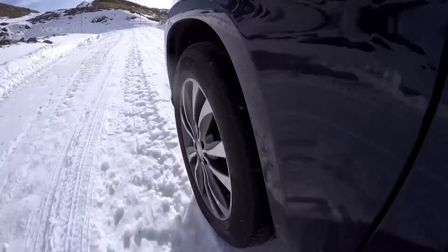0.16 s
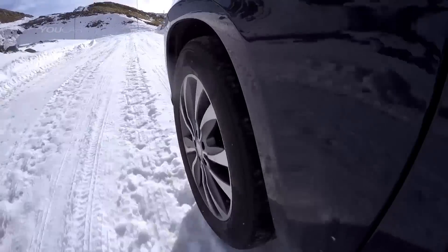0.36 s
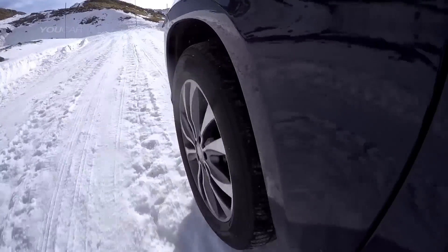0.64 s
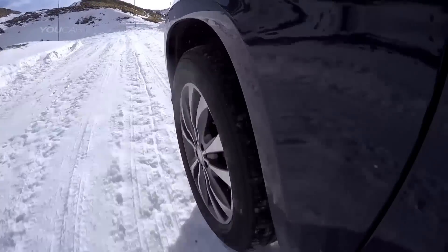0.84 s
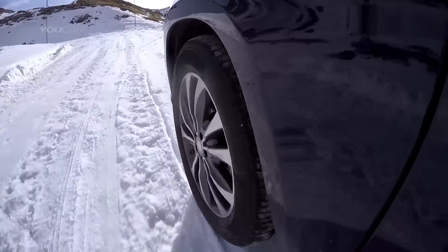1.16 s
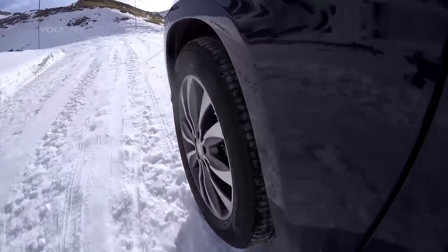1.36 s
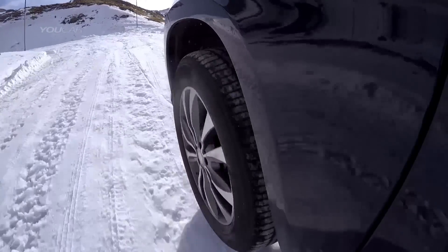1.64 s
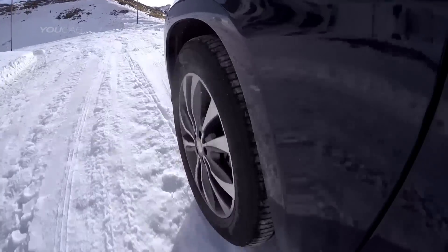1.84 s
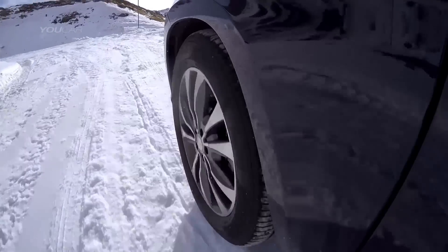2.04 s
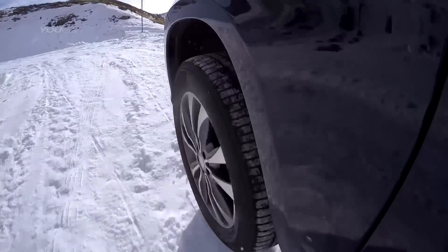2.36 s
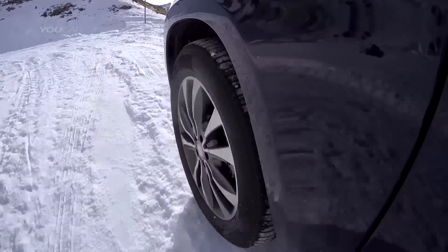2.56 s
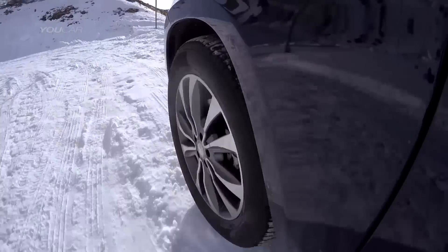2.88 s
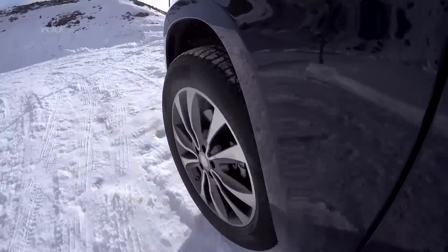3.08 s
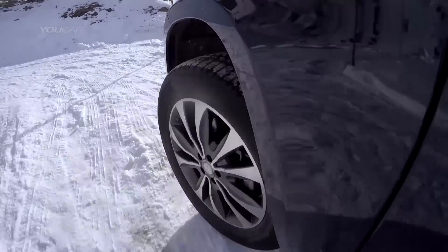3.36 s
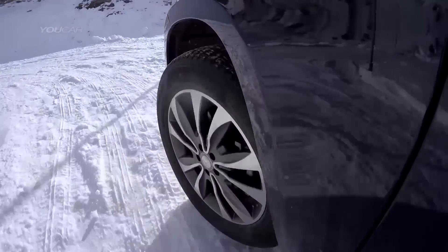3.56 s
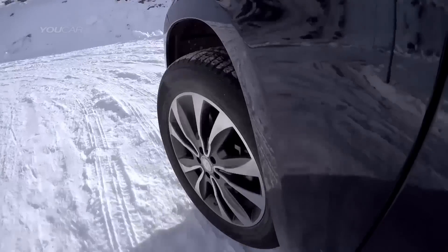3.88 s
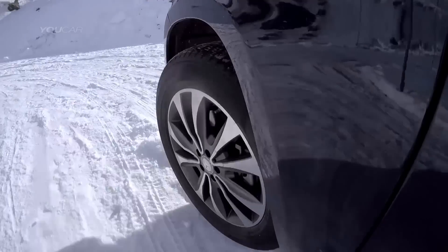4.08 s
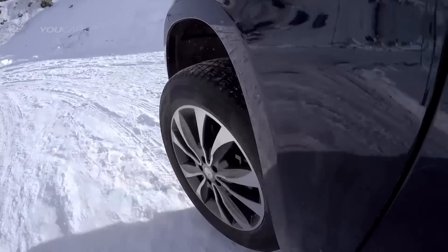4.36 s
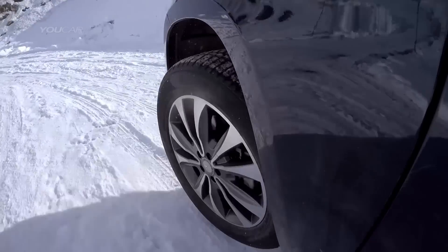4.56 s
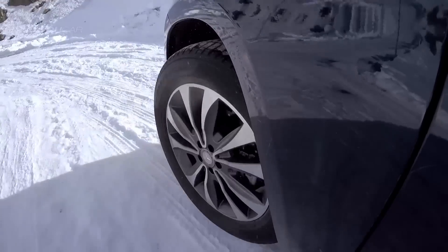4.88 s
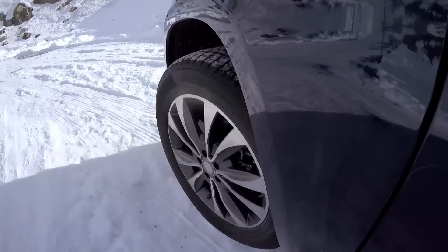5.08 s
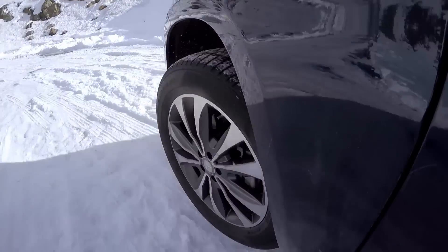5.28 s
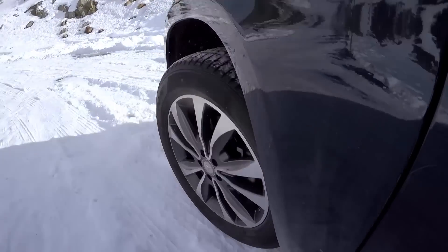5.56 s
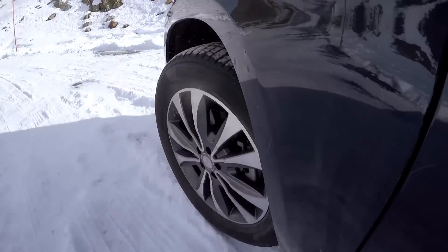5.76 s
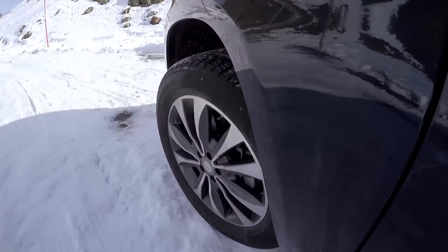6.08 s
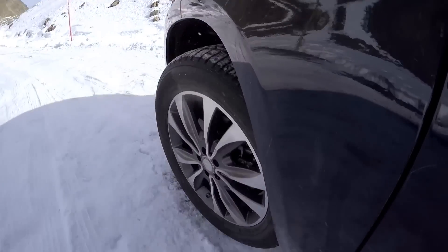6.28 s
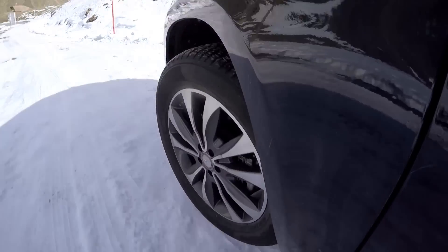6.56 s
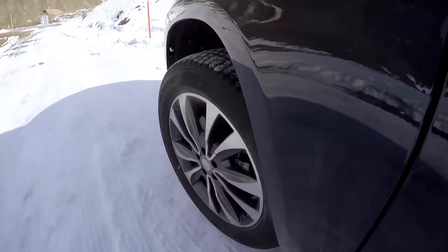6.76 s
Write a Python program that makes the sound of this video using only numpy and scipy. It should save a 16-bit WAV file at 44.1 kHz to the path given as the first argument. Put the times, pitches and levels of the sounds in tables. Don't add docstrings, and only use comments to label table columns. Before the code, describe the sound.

A mono, dry, very close outdoor sound from a microphone on a car door beside the front wheel. Throughout, a deep uneven shudder sways and booms like heavy wind rumble, with low road drone, soft tread rush and faint engine-bay hiss. From 0 to 2.5 s the tyre rolls straight: a hard ice tick at 0.1 s, then small brittle crust cracks, clustered from 0.7 to 1.0 s, and fine grit ticking on the panel. A strong sharp crack and chip hit at about 1.95 s with a puff of powder. The car eases off, and from 2.6 s the turning tyre sticks and slips in short runs of hollow, woody crunches. Big snow blocks snap near 3.1, 3.55 and 3.9 s; a hard tick lands at 4.7 s; the densest, loudest crunching comes at 5.2-5.6 s. Sparser crunches and ticks continue to 6.9 s, over a barely audible, fluttering high electronic whine.

```python
import sys
import numpy as np
from scipy import signal
from scipy.fft import rfft, irfft, next_fast_len
from scipy.io import wavfile
from scipy.ndimage import uniform_filter1d, map_coordinates

SR = 44100
rng = np.random.default_rng(int(sys.argv[2]) if len(sys.argv) > 2 else 0)


def invert_db(level):
    return 10 ** (np.asarray(level, dtype=float) / 20)


def int16_out(signal):
    q = np.round(np.clip(np.atleast_2d(signal).T, -1, 1) * 32767)
    wavfile.write(sys.argv[1], SR, q.astype(np.int16))


N = 305613

# start_s, peak_db, bright_db
CRUST_CRACKS = [(0.058, -21, 0), (0.0878, -20, -2), (0.4956, -30, -2), (.5061, -25.5, -8), (0.683, -24, 6),
                (0.719, -19, 4), (0.7422, -18, 0), (0.7652, -21.5, -1), (.8182, -16.5, -1), (.864, -22, 4),
                (0.886, -22, 6), (.9224, -39, 3), (0.975, -19.5, -0.5), (.9955, -17, 2), (1.0208, -34, 2),
                (1.1675, -22, 5), (1.358, -20.5, -0.5), (1.6177, -24, 9), (1.718, -18, -2), (1.75, -22, -2),
                (1.7592, -16.5, 7.5), (1.7837, -29.5, -15), (1.8184, -30, 5), (1.8995, -29, 7),
                (1.9592, -12, -2.5), (2.1297, -21, -1), (2.234, -27, -1), (2.308, -23, 0),
                (2.4302, -36, -11), (2.5429, -21, 3)]
# first_s, last_s, slip_count, peak_db
SLIP_RUNS = [(2.598, 2.7434, 3, -9), (2.793, 2.8086, 2, -6.5), (2.846, 2.86, 2, -23),
             (2.895, 2.968, 3, -7.5), (2.917, 2.997, 3, -20.5), (3.014, 3.084, 4, -20),
             (3.147, 3.167, 2, -17), (3.453, 3.478, 2, -17.5), (3.7308, 3.854, 3, -12.5),
             (3.769, 3.91, 3, -16.5), (4.3887, 4.4282, 2, -11.5), (4.573, 4.636, 2, -17),
             (4.6548, 4.6705, 2, -9), (4.698, 4.7633, 3, -12.5), (4.942, 4.985, 2, -22.5),
             (5.039, 5.054, 2, -14), (5.088, 5.106, 2, -15), (5.181, 5.224, 3, -14.5),
             (5.267, 5.2815, 2, -10.5), (5.377, 5.3898, 2, -6.5), (5.415, 5.451, 3, -5),
             (5.481, 5.528, 2, -11.5), (5.559, 5.613, 2, -13), (5.719, 5.739, 2, -21),
             (5.786, 5.8, 2, -23.5), (6.16, 6.194, 2, -20), (6.23, 6.308, 2, -16.5),
             (6.644, 6.725, 3, -14.5), (6.791, 6.824, 3, -15.5), (6.85, 6.867, 2, -10.5)]
# start_s, peak_db
SNOW_BLOCKS = [(2.7038, -19), (2.73, -19), (2.78, -29), (2.884, -26), (3.0976, -15), (3.1195, -7.5),
               (3.217, -12.5), (3.547, -8), (3.868, -8.5), (3.8761, -17), (3.914, -4.5), (4.1023, -24.5),
               (4.198, -11), (4.326, -19), (4.458, -26), (4.4922, -15.5), (4.508, -13.5), (4.802, -13.5),
               (5.3189, -12.5), (5.343, -7), (5.3523, -2.5), (5.5817, -16), (5.8173, -14), (5.9748, -16.5),
               (6.107, -17), (6.281, -21.5), (6.369, -21), (6.562, -11), (6.752, -10), (6.921, -12.5)]
# pitch_hz, width_hz, level_db
ARCH_MODES = [(493.4, 44, -2), (687, 72, 3), (918.4, 45, -6), (1315, 144, -5), (1614, 133, -3),
              (1817, 143, -7), (2244, 69, -6), (2467, 87, -5.5), (2914.5, 170, -12), (4320, 100, -31),
              (5050, 260, -27), (5780, 180, -23.5)]
# pitch_hz, width_hz, level_db
TYRE_MODES = [(233, 14, -6.5), (295.3, 65, -0.5)]

# start_s, peak_db, panel_share_db, bright_db
ICE_CHIPS = [(0.0874, 4, -20.5, -0.5), (0.1994, -18, -10, 11), (0.7837, -24, -4.5, 22.5),
             (0.8883, -14, -7, 11), (0.9407, -21, 0, 15.5), (1.7185, -23, -5, 9), (1.82, -17.5, -8, 8),
             (1.831, -11.5, -12.5, 3), (1.9586, 4.5, -11.5, 7), (1.9592, -5, -9, -8),
             (1.984, -13.5, -10.5, 7), (2.5579, -7, -12.5, 4), (2.814, -17, -5.5, 1),
             (2.8585, -15.5, -7, 0), (3.481, -17, -5, 16), (3.7012, -16.5, -12, 6), (3.8483, -12, -20, -8),
             (4.147, -17.5, -23, 1), (4.619, -16, -10.5, 6), (4.7011, -0.5, -9, 12),
             (4.7654, -16.5, -34, 6), (4.9823, -18.5, -21, 7), (5.0044, -12, -8, 1),
             (5.4504, -21.5, -7, 12.5), (5.5354, -10.5, -17, -1), (5.746, -15, -13, -26),
             (5.83, -22, -23, 11), (6.015, -24.5, -15, 14.5), (6.2466, -23, -12, 6),
             (6.3436, -9.5, -15, 10)]
# start_s, peak_db, bright_db
PANEL_GRIT = [(0.0306, -28, -12), (0.0743, -33, 8), (0.1056, -36, -14), (0.1151, -35, 6),
              (0.18, -26.5, -3), (0.2241, -37, 3), (0.2334, -33, 1), (0.5652, -31.5, -7),
              (0.5924, -42, 12), (0.9471, -24, -10), (0.9718, -25.5, 8), (0.9972, -30, 7),
              (1.0066, -31, 4), (1.0219, -29, -6), (1.0762, -32, -2), (1.091, -45, 11),
              (1.1127, -41, 10), (1.1716, -43, 13), (1.1825, -32, 6), (1.1954, -42, 17),
              (1.2052, -36, 2), (1.2115, -40, 15), (1.228, -35, 9), (1.3032, -30.5, 5), (1.3387, -49, 9),
              (1.351, -32, 11), (1.3561, -29, -2), (1.3951, -31.5, -5), (1.63, -38, 4), (1.6597, -32, 0),
              (1.6771, -28, 1), (1.7067, -32, 0), (1.7261, -28, 4), (1.7647, -31, -20), (1.8088, -46, 5),
              (1.842, -29, 2), (1.8755, -37, 6), (1.8829, -32, 0), (1.8912, -26, -12), (1.8953, -29, -1),
              (1.9003, -29, 7), (1.9054, -27, -3), (1.9183, -30, -3), (1.9222, -30, 15), (1.938, -33, 1),
              (1.95, -27, -4), (1.9749, -44, 10), (1.992, -31, 4), (2.0072, -30, 9), (2.0261, -40, 13),
              (2.516, -34, -25), (2.076, -35, -5), (2.1105, -43, 4), (2.1285, -27.5, -2),
                (2.1818, -30.5, 12), (2.3981, -40, -13), (2.4422, -46, 11), (2.5358, -39, 4),
                (2.5693, -46, 8), (2.6347, -31, -2), (2.6471, -41, 14), (2.8066, -30, -6), (2.9453, -40, 8),
                (2.969, -35, -27), (3.3857, -31.5, 4), (3.3949, -34, 2), (3.4008, -40, -3),
                (3.5344, -42, 7), (3.5495, -32, -8), (3.6075, -30, 1), (3.616, -37, -4), (3.681, -27, -4),
                (3.6896, -36, 22), (3.696, -33, 10), (3.7141, -35, 1), (3.7295, -45, 1), (3.7804, -44, 7),
                (3.812, -35, -7), (3.8316, -38, 9), (3.86, -21.5, -15), (3.915, -28, -30),
                (3.9763, -28.5, -8), (4.043, -37, -6), (4.093, -50, 14), (4.1554, -42, -1),
                (4.2112, -40, 5), (4.2217, -41, 5), (4.2829, -41, 10), (4.2974, -37, -7), (4.4134, -39, 0),
                (4.5881, -31, 4), (4.592, -28, 2), (4.6283, -44, 16), (4.649, -42, 5), (4.673, -37, 8),
                (4.687, -42, -9), (4.6944, -24, 1), (4.7124, -47, -6), (4.735, -26, -13), (4.75, -44, -6),
              (4.771, -44, 1), (4.799, -34.5, -9), (4.8561, -27, 2), (4.883, -37, 15),
                  (4.8982, -45, 21), (4.9411, -39, 5), (4.9462, -42, 0), (4.962, -35, 6), (4.9869, -27, 5),
                  (5.13, -29.5, 5.5), (5.184, -30.5, 4), (5.2397, -29, -10), (5.3561, -46, -27),
                  (5.3944, -32, -4), (5.4182, -40, -28), (5.509, -40, 10), (5.5179, -33, 5),
                  (5.5899, -37, 2), (5.6194, -33, 4), (5.6789, -48, 14), (5.716, -38, 4), (5.726, -37, 9),
                  (5.785, -32, 8), (5.901, -39.5, -11), (5.9475, -37, 2), (5.9564, -31.5, 5),
                  (6.0763, -32, -5), (6.0891, -34, -6), (6.126, -40, 2), (6.1468, -38, 10),
                  (6.1862, -37, 1), (6.212, -37, 4), (6.2272, -29, 13), (6.2402, -32, 5), (6.26, -33, 14),
                  (6.2666, -29, -9), (6.273, -28, -2), (6.312, -33, 5), (6.3237, -30, -5),
                  (6.3372, -47, 22), (6.3754, -31, -14), (6.3824, -28, -2), (6.387, -31, -1),
                  (6.3927, -29, -3), (6.4175, -35, 5), (6.4676, -35, -4), (6.471, -27.5, -16),
                  (6.6794, -38.5, 10), (6.6872, -45, 13), (6.737, -31, -17)]
# pitch_hz, width_hz, level_db
PANEL_MODES = [(2040, 330, -5), (2940, 1000, -4), (4350, 510, -3.5), (4800, 110, 2), (5350, 260, -2.5)]
# pitch_hz, width_hz, level_db
SKIN_MODES = [(6710, 740, -1), (8790, 790, -3), (10530, 590, -6.5)]
# pitch_hz, width_hz, level_db
EDGE_MODES = [(11260, 3400, -8.5), (15800, 2700, -12)]

# pitch_hz, level_db (per Hz)
DRONE_SPECTRUM = [(95, 6.5), (125, -3), (151, 2.5), (170, -6), (213, 1), (250, -6.5), (295, -2),
                  (340, -12.5), (380, -28.5), (450, -14.5)]
# start_s, drone_db
ROAD_ROUGHNESS = [(0.0, -35), (0.04, -45.5), (0.21, -37), (1.79, -44), (2.41, -41), (2.45, -47.5),
                  (2.76, -39.5), (3.24, -45), (3.9, -39.5), (4.15, -43), (4.21, -37.5), (4.9, -45.5),
                  (5.34, -40.5), (6.5, -45.5), (6.56, -40.5), (6.77, -40), (6.89, -46), (6.93, -32)]
# pitch_hz, level_db (per Hz)
TREAD_SPECTRUM = [(240, -10), (400, -2), (570, -4), (684, -1), (821, -3.5), (918, 2.5), (1100, -2.5),
                  (2240, -5), (2910, -8.5), (3290, -13), (3750, -9.5), (4500, -22.5), (5850, -19.5),
                  (9900, -120)]
# start_s, rolling_db
ROLLING_PACE = [
    (0, -0.5),
    (.9, -1),
    (1.5, -4),
    (2.4, -8),
    (6.93, -9),
]
# middle_s, half_length_s, peak_db
SNOW_PATCHES = [(1.5, .25, -51), (1.77, 0.064, -31), (1.9, 0.086, -36.5), (2.78, 0.022, -30.5),
                (2.95, 0.048, -30), (3.15, 0.48, -39.5), (3.89, 0.045, -27), (4.21, 0.04, -39),
                (4.65, 0.088, -31.5), (4.44, 0.05, -42), (5.07, 0.057, -47), (5.41, 0.12, -33.5),
                (5.8, 0.25, -42.5), (6.27, 0.17, -38.5), (6.8, 0.16, -38)]
# middle_s, half_length_s, peak_db
POWDER_SPRAYS = [
    (0, 0.24, -61),
    (.9, 0.71, -63.5),
    (1.68, 0.032, -57),
    (1.93, 0.057, -50),
    (3.68, 0.15, -62.5),
    (4.21, 0.15, -69),
    (4.91, 0.21, -65.5),
    (6.11, 0.051, -63),
    (6.25, 0.032, -67),
    (6.37, 0.11, -65),
]
# pitch_hz, level_db (per Hz)
POWDER_SPECTRUM = [(2000, -37), (4500, 6), (6000, -2.5), (9000, -5.5), (12000, -5), (14500, -10),
                   (15300, -12)]
# pitch_hz, width_hz, level_db
ENGINE_BAY_MODES = [(2894, 550, 5), (3700, 177, 6.5), (4650, 1540, -2), (5430, 130, -5.5),
                    (6650, 340, -7.5)]
# pitch_hz, width_hz, level_db
IDLE_MODES = [(2965, 124.3, -1), (3670, 300, -5.5), (6800, 360, -11)]

# start_s, pitch_hz
SWAY_CURVE = [(0, 27.9), (3, 28.52), (3.4, 24.43), (5.3, 22.46), (5.45, 28.36), (6.2, 25.84), (6.93, 24.93)]
# start_s, pitch_hz
BOOM_CURVE = [(0, 70.3), (.45, 67.14), (.72, 69.9), (.84, 79), (1.0, 71.96), (1.5, 72), (2.02, 63.36),
              (2.18, 68.67), (2.4, 64.8), (3.1, 70.93)]
# start_s, drift_share
BOOM_WANDER = [(0, 0.04), (1, 0.025), (2.3, .03), (2.6, 0.1007), (6.93, 0.089)]
# middle_s, half_length_s, peak_db
ROAD_RUTS = [(.03, 0.25, -35), (.42, 0.18, -13.5), (.9, 0.074, -19), (1.15, 0.11, -15.5),
             (1.6, 0.39, -13.5), (2.35, 0.063, -12.5), (2.72, 0.07, -10.5), (3.17, 0.22, -12.5),
             (3.58, 0.13, -14), (3.92, 0.044, -7.5), (4.16, 0.17, -11.5), (4.42, 0.15, -14),
             (4.8, 0.095, -16.5), (5.05, 0.12, -12.5), (5.28, 0.16, -9), (5.77, 0.055, -26),
             (5.9, 0.019, -9), (6.05, 0.1, -27), (6.26, 0.092, -21), (6.7, 0.5, -12), (6.92, 0.072, -12.5)]
# middle_s, half_length_s, peak_db
SNOW_RIDGES = [(.1, 0.16, -8), (.39, 0.088, -9.5), (.76, 0.11, -6.5), (1.08, 0.037, -12.5),
               (1.42, 0.34, -6.5), (1.87, 0.089, -12.5), (2.19, 0.11, -5.5), (2.62, 0.2, -22.5),
               (3.32, 0.15, -14), (3.9, 0.087, -16), (4.15, 0.018, -19), (4.3, 0.062, -14.5),
               (4.59, 0.13, -15.5), (5, 0.038, -18), (5.19, 0.046, -19), (5.48, 0.09, -15.5),
               (5.77, 0.018, -13), (5.9, 0.025, -20), (6.15, 0.22, -22), (6.73, 0.21, -16.5)]
# pitch_hz, level_db (per Hz)
SHUDDER_SPECTRUM = [(8, -52), (18, -18), (36, -0.5), (46, 1), (62, -0.5), (88, -0.5), (100, -19.5),
                    (125, -38)]

# start_s, pitch_hz, level_db
FRAME_LOAD = [
    (0, 9950, -62),
    (.008, 9660, -55),
    (.018, 8950, -55),
    (.026, 8840, -55),
]
BUSY_FRAMES = [1, 5, 8, 11, 15, 19, 21, 25, 29, 32, 35, 39, 43, 46, 49, 53, 57, 60, 63, 67, 71, 73, 77, 80,
               81, 85, 88, 91, 95, 99, 102, 106, 110, 112, 116, 121, 124, 127, 131, 135, 138, 141, 145, 149,
               151, 155, 159, 163, 165, 169]
# pitch_hz, level_db
MIC_RESPONSE = [(8, 0.5), (14600, -0.5), (15300, -5), (16400, -26), (16500, -62)]


def unit(x):
    return x / np.sqrt(np.mean(x ** 2) + 1e-20)


def noise():
    return rng.standard_normal(N)


def curves(rows):
    s, *cols = np.transpose(rows)
    return [np.interp(np.arange(N) / SR, s, c) for c in cols]


def wobble(rate):
    knots = rng.standard_normal(int(N * 400 / SR) + 4)
    return map_coordinates(knots, [np.arange(N) * min(rate, 400) / SR])


def swells(rows, floor_db, round_top=1):
    t = np.arange(N) / SR
    peaks = sum(invert_db(db - 7 * (np.abs(t - s) / half) ** round_top) for s, half, db in rows)
    return 20 * np.log10(invert_db(floor_db) + peaks)


def filtered(x, response):
    m = next_fast_len(N + SR // 2)
    return irfft(rfft(x, m) * response(np.fft.rfftfreq(m, 1 / SR)), m)[:N]


def shaped(x, spectrum):
    f, db = np.transpose(spectrum)
    return filtered(x, lambda hz: invert_db(np.interp(np.log(hz + 1), np.log(f + 1), db, -120, -120)))


def coloured(x, spectrum):
    return unit(shaped(x, spectrum))


def resonant(x, modes):
    def response(f):
        return sum((-1) ** k * invert_db(db) * 1j * f * w / (c * c - f * f + 1j * f * w)
                   for k, (c, w, db) in enumerate(modes))
    return filtered(x, response)


def muffled(hz):
    return 1 / (1 + 1j * (hz / 6450) ** 5) ** 2


def bursts(times, dbs, t60s, rise, rough_db, count=40, fall=1):
    t = np.arange(60 * count) / SR
    shape = (1 - np.exp(-t / rise)) * invert_db(-60 * (t / t60s[:, None]) ** fall)
    cracks = np.repeat(rng.standard_normal((len(times), count)), 60, axis=1)
    rows = shape * invert_db(rough_db * cracks) * rng.standard_normal(shape.shape)
    energy = np.linalg.norm(shape, axis=1, keepdims=True) / np.linalg.norm(rows, axis=1, keepdims=True)
    rows *= invert_db(dbs[:, None]) * energy
    at = np.round(times * SR).astype(int)[:, None] + np.arange(len(t))
    return np.bincount(at.ravel(), rows.ravel(), N + len(t))[:N]


def crunch():
    slips = [(s, db, 0) for first, last, count, db in SLIP_RUNS
             for s in np.linspace(first, last, round(count))]
    blocks = [(s, db, 0) for s, db in SNOW_BLOCKS]
    s, db, bright_db = np.transpose(CRUST_CRACKS + slips + blocks)
    t60 = 0.025 * invert_db(0.29 * (db + 18.5))
    icy = np.abs(s[:, None] - np.transpose(ICE_CHIPS)[0]).min(axis=1) < .003
    low_db = -14 - 0.45 * (db + 25.5) - 12 * icy
    colour_db = 1.04 * rng.standard_normal((len(s), 4)) + np.outer(bright_db, [-1, 1, 1, -1])

    def upper(part_db):
        crack = bursts(s - .0006, part_db + 13.5, np.full(len(s), .009), rise=0.0001, rough_db=0.0, count=8)
        return bursts(s - .0008, part_db + 8.5, t60, rise=0.00049, rough_db=5.0, fall=1.324) + crack

    parts = [ARCH_MODES[2:6], ARCH_MODES[6:9], ARCH_MODES[9:]]
    rings = sum(resonant(upper(db + colour_db[:, k]), modes) for k, modes in enumerate(parts))
    lower_db = db + low_db + 24.5 + colour_db[:, 3]
    lower = bursts(s, lower_db, 1.145 * t60, rise=0.0021, rough_db=6.5, fall=1.43)
    thud = resonant(resonant(lower, TYRE_MODES), TYRE_MODES)
    return filtered(rings + resonant(lower, ARCH_MODES[:2]), muffled) + invert_db(-3.0) * thud


def chips():
    grit = [(s, db + 5.5, -9, bright_db + 3)
            for s, db, bright_db in PANEL_GRIT]
    s, db, body_db, edge_db = np.transpose(ICE_CHIPS + grit)
    t60 = 0.0056 * invert_db(0.08 * (db + 40.5))

    def tick(level_db):
        return bursts(s - .0003, level_db, t60, rise=.00005, rough_db=2.5, count=10)

    def stiff(hz):
        return 1 / (1 - 1j * (1250 / (hz + 1)) ** 2)

    def thin(hz):
        return 1 / (1 - 1j * (8000 / (hz + 1)) ** 3)

    blow, skin, edge = tick(db + body_db + 18.5), tick(db + 2.5), tick(db + edge_db + 0.5)
    n = len(ICE_CHIPS)
    rattle = bursts(s[:n], db[:n] - 11.5, np.full(n, .045), rise=0.0026, rough_db=4.0)
    panel = filtered(resonant(blow + filtered(rattle, muffled), PANEL_MODES), stiff)
    return panel + resonant(skin, SKIN_MODES) + filtered(resonant(edge, EDGE_MODES), thin)


def patter(powder_db):
    density = .008 * np.clip(invert_db(powder_db + 62), .2, 1)

    def grains():
        size = invert_db(5.0 * wobble(45) + 0.96 * rng.exponential(size=N))
        return size * noise() * (rng.random(N) < density)

    def coarse(hz):
        return 1 / (1 + (hz / 12500) ** 4)

    return 0.51 * grains() + filtered(grains(), coarse) + filtered(grains(), lambda hz: 1 - coarse(hz))


def rolling():
    crumble_db, powder_db = swells(SNOW_PATCHES, -65), swells(POWDER_SPRAYS, -69)
    pace_db, = curves(ROLLING_PACE)
    rough_db, = curves(ROAD_ROUGHNESS)
    lumps = wobble(30)
    drone = coloured(invert_db(1.6 * lumps) * noise(), DRONE_SPECTRUM)
    tread_db = 2.25 * lumps + 0.41 * wobble(7.1) + 1.9 * wobble(150)
    tread = coloured(invert_db(tread_db) * noise(), TREAD_SPECTRUM)
    crumble = unit(resonant(invert_db(5.4 * wobble(70) + 7.5 * wobble(300)) * noise(), ARCH_MODES[1:9]))
    hiss = unit(resonant(resonant(invert_db(3.2 * wobble(60)) * noise(), ENGINE_BAY_MODES), ENGINE_BAY_MODES))
    idle = unit(resonant(resonant(noise(), IDLE_MODES), IDLE_MODES))
    powder = coloured(0.84 * unit(patter(powder_db)) + 0.62 * noise(), POWDER_SPECTRUM)
    mix = invert_db(rough_db + 1.7) * drone + invert_db(-38.0 + pace_db) * tread
    mix = mix + invert_db(-40.5 + 1.8 * pace_db) * hiss + invert_db(-57.0) * idle
    return mix + filtered(invert_db(crumble_db - 5.5) * crumble, muffled) + invert_db(powder_db + 5.5) * powder


def body():
    def swing(hz, db, drift, flutter_db):
        phase = 2 * np.pi * np.cumsum(hz * (1 + drift * wobble(22))) / SR
        return np.sqrt(2) * invert_db(db + flutter_db * wobble(18)) * np.sin(phase)

    sway_hz, boom_hz, boom_drift = curves(SWAY_CURVE)[0], curves(BOOM_CURVE)[0], curves(BOOM_WANDER)[0]
    sway_db, boom_db = swells(ROAD_RUTS, -31.5), swells(SNOW_RIDGES, -33.5, round_top=1.49)
    shudder = invert_db(-23.0 + 3.1 * wobble(9)) * coloured(noise(), SHUDDER_SPECTRUM)
    sway = swing(sway_hz, sway_db - 2.5, drift=0.13, flutter_db=3.0)
    boom = swing(boom_hz, boom_db - 5.5, drift=boom_drift, flutter_db=2.03)
    return sway + boom + shudder


def whine():
    frame_s, first_frame_s = .04, .012
    t = np.arange(N) / SR - first_frame_s + frame_s
    frame = (t / frame_s).astype(int)
    start_s, pitch_hz, level_db = np.transpose(FRAME_LOAD)
    step = np.searchsorted(start_s, t % frame_s, "right") - 1
    busy = np.isin(frame, BUSY_FRAMES) & (step > 1)
    pitch = np.where(busy, 9320 + 130 * wobble(250), pitch_hz[step]) + 90 * wobble(300)
    pitch = uniform_filter1d(pitch, size=40)
    level = invert_db(level_db[step] + 0.72 * wobble(360) - 3.5)
    main_rail = np.sqrt(2) * level * np.sin(2 * np.pi * np.cumsum(pitch) / SR)
    second_rail = invert_db(-60.5) * (step == 0) * np.sin(2 * np.pi * 8550 * t + 1.3 * wobble(450))
    return main_rail + second_rail


def scene():
    return (crunch() + chips() + rolling() + body() + whine())[None]


def band_limit(x):
    return signal.sosfilt(signal.butter(12, 16470, fs=SR, output="sos"), x)


def record(dry):
    mix = np.clip([shaped(dry[0], MIC_RESPONSE)], -1, 1)
    return band_limit(mix)


dry = scene()
out = record(dry)
int16_out(out)
```